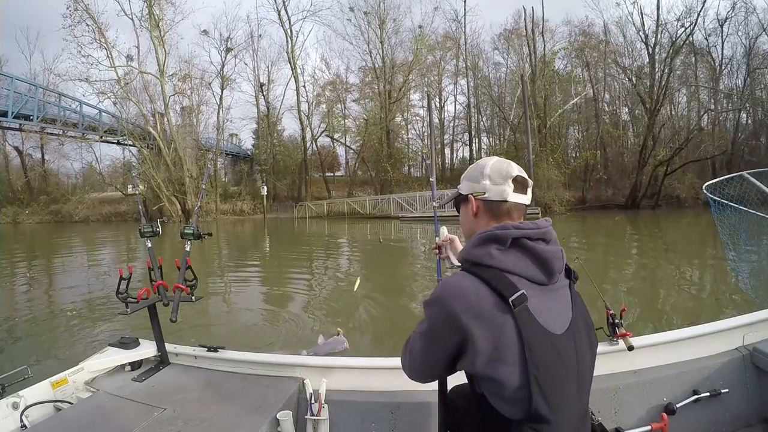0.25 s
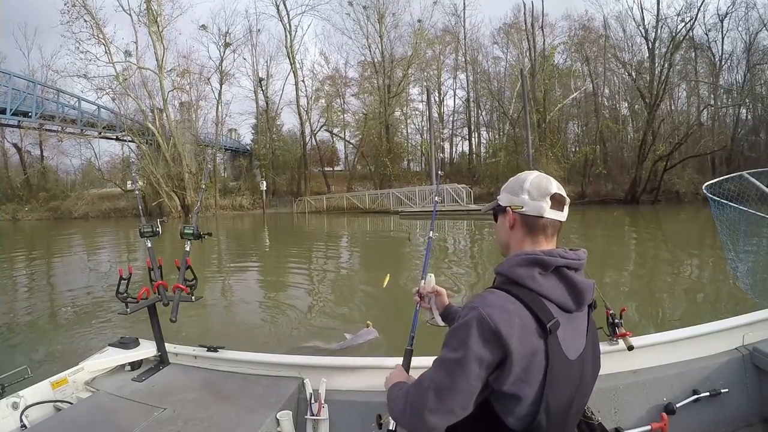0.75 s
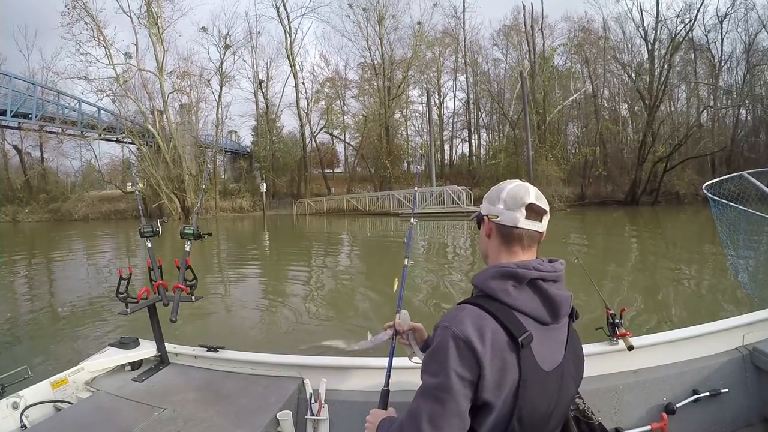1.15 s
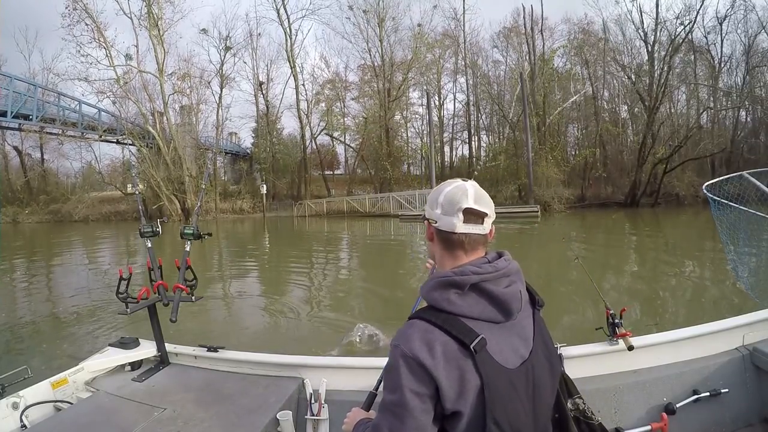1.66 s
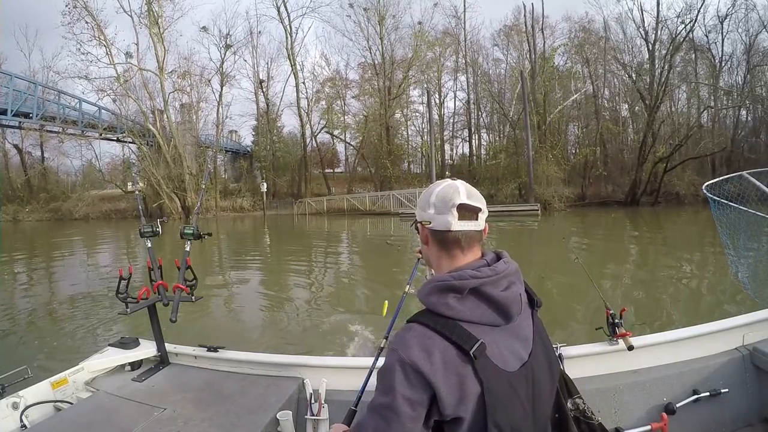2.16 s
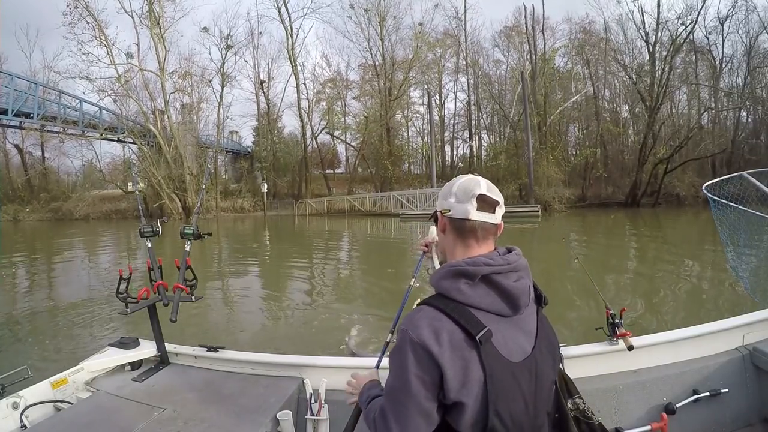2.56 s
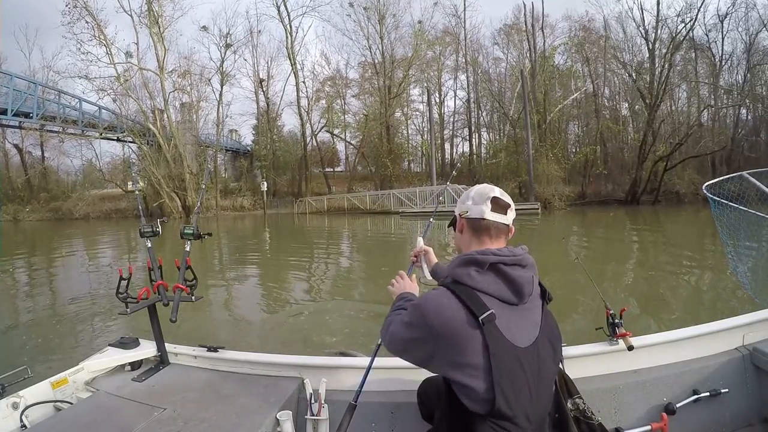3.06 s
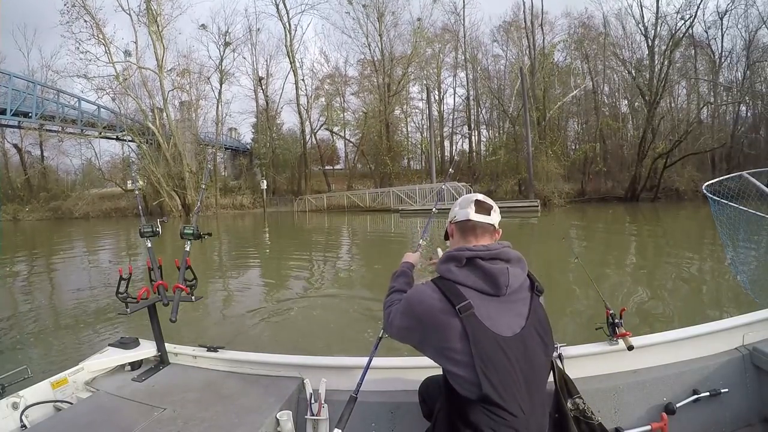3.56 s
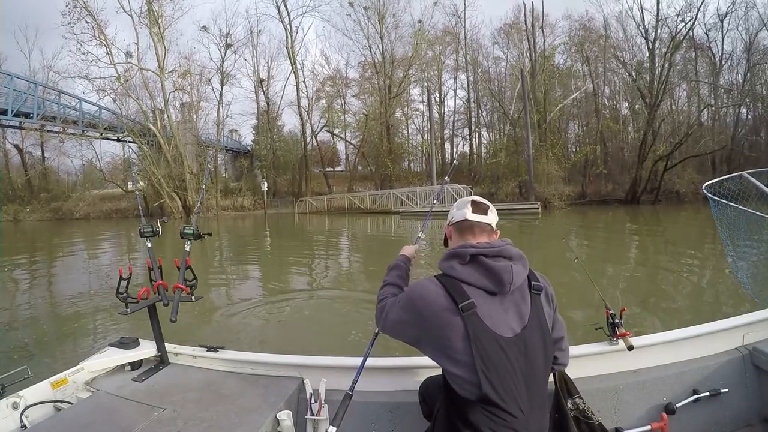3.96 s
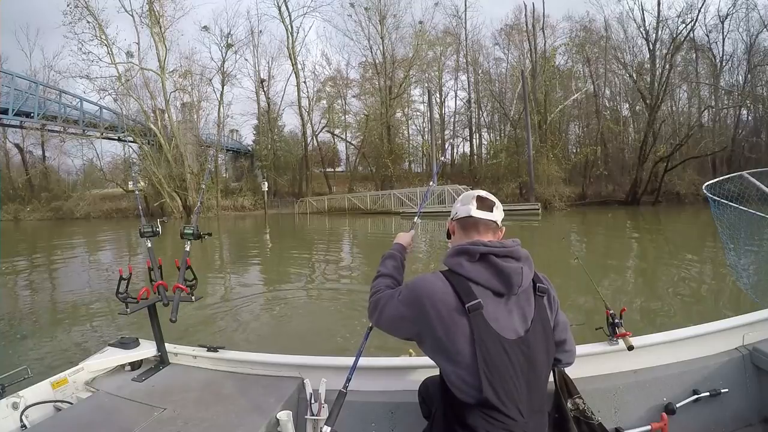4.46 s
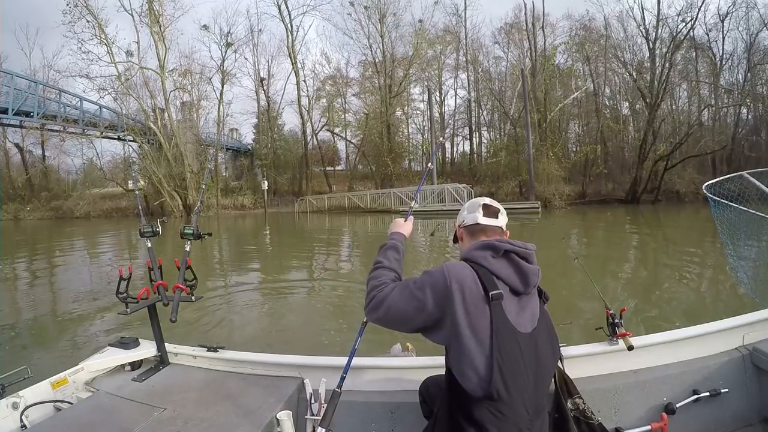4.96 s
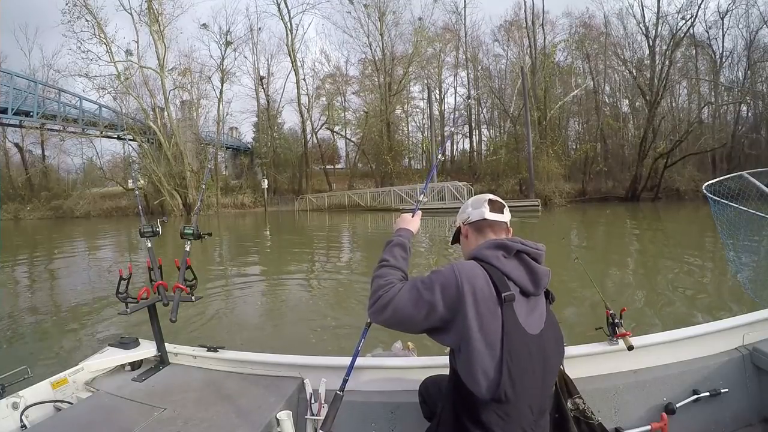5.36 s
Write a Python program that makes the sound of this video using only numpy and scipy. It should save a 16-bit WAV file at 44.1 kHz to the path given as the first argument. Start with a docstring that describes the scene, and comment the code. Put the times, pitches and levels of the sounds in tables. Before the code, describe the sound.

A fish is fought beside a metal boat. Low rumble and scuffing boots open, cloth swishes, and small bite bells chatter with growing energy. Splashes and bubbling accompany a loud hull bang, followed by a cluster of thuds and clangs. The water calms, bells keep tinkling irregularly, and a single wet smack closes it. Dry outdoor air, close single-channel microphone on the boat.

```python
"""Landing a fish in a metal boat

An angler lands a fish. Knocks travel through the hull as bending waves, treble first, and ring its plating.
Small bite bells and their clip on the rod ring and rattle as dying sines. Boots scrape, a sole squeaks and
bright bursts of hiss swish by, all shaped noise. The fish splashes: bubbles and one tail slap, among sharp
bright ticks. Outdoor air and the hull's low ringing, swelling after knocks, lie underneath as soft noise."""
import sys
import numpy as np
from scipy import signal
from scipy.fft import rfft, irfft
from scipy.io import wavfile
from scipy.ndimage import uniform_filter1d

SR = 44100
rng = np.random.default_rng(int(sys.argv[2]) if len(sys.argv) > 2 else 0)


def wav_out(sig):
    """Save sig, one row per channel (or a flat mono array), as 16-bit PCM at SR to the path in sys.argv[1]."""
    wavfile.write(sys.argv[1], SR, np.round(np.clip(np.atleast_2d(sig).T, -1, 1) * 32767).astype(np.int16))


N = 247401  # length in samples


# knocks on the hull: start_s, blow_db, contact_ms, panel_hz (pitch of the panel struck),
# lift_db (boost around that pitch), lag_ms (200 Hz behind the treble), front_db (first wave front)
KNOCKS = [(0.0, -41, 0.4, 359, 17, 2.77, 26), (1.107, -36.5, 0.55, 252, -6, 12, 5),
          (2.034, -11, 0.048, 195, 6.5, 10.2, 31.5), (2.576, -18.5, 0.12, 183, 5.5, 10.1, 24),
          (2.646, -25.5, 0.92, 271, 12.5, 9.4, 5), (2.746, -33.5, 0.81, 74, 5.5, 7.3, 5),
          (2.909, -28, 0.27, 205, 4, 9, 20), (2.964, -28, 1.64, 92, 8, 15, 5),
          (3.002, -40, 0.21, 296, 8.5, 8.2, 5), (3.04, -35, 1.3, 97, 11, 8.5, 5),
          (3.234, -18, 0.12, 437, 2, 6.18, -4), (3.237, -33.5, 0.0066, 4370, 3, 1.94, 15),
          (3.339, -21.5, 0.33, 185, 2, 7.2, 36), (3.35, -32.5, 0.95, 106, 15, 8.7, 5),
          (4.968, -46, 0.019, 590, 18, 4.1, 17), (5, -53, 0.035, 930, 13, 3.3, 12)]
# clear notes of the hull plating: pitch_hz, level_db, t60_s (time to fall 60 dB, before the water damps it)
HULL_NOTES = [(73.8, 5.5, 0.33), (102.3, -3.5, 0.41), (163.8, 0, 0.195), (205, 2, 0.16), (252, -7, 0.24),
              (310.7, -2, 0.22), (370, -18, 0.22), (406.5, -8, 0.21), (485, -9.5, 0.051), (529, -10, 0.12),
              (593, -5, 0.12), (673, -2, 0.09), (802, -12.5, 0.19), (834, -11.5, 0.12), (874, -11, 0.18),
              (1056, -16, 0.09), (1215, -7.5, 0.049), (1584, -18, .035), (1960, -3.5, 0.016),
              (2720, 4, 0.013)]
# dense ringing between the clear notes: pitch_hz, level_db
SHUDDER = [(25, -1), (60, 53.5), (200, 1.5), (800, -2.5), (2500, -15.5), (5000, -9.5), (9000, -2),
           (15000, -32)]
# how long that ringing lasts: pitch_hz, t60_s (before the water damps it)
SHUDDER_T60 = [(50, 0.89), (300, 0.36), (1000, 0.13), (3000, 0.18), (10000, 0.047)]
WET_DAMPING = 1.81  # the water under the hull shortens every ring by this factor


def knock(blow_db, contact_ms, panel_hz, lift_db, lag_ms, front_db):
    """A blow rings the plating; bending waves bring the treble first and the bass late."""
    size = 16384
    t, hz = np.arange(size) / SR, np.fft.rfftfreq(size, 1 / SR)
    notes = ring(np.array(HULL_NOTES) / [1, 1, WET_DAMPING], np.ones(len(HULL_NOTES)), t)
    dense = 4.96 * dying(SHUDDER, np.array(SHUDDER_T60) / [1, WET_DAMPING], count=size)
    # one pulse ahead of all reflections
    front = gain_of(front_db) * hz / (hz + 500) / (1 + (hz / 3000) ** 2)
    kept = t < 0.33  # seconds of ringing
    bass_cut = hz / (hz + 120)
    body = rfft(notes * kept) + (rfft(dense * kept) + front) * bass_cut

    octaves_away = np.log2((hz + 1) / panel_hz)
    panel = gain_of(lift_db * np.exp(-(octaves_away / 0.28) ** 2))
    # a soft blow lasts longer, with less treble
    contact = 1 / (1 + 2j * np.pi * hz * contact_ms / 1000) ** 2
    # the lowest pitches are cut away below about 45 Hz
    low_cut = (1j * hz / (45 + 1j * hz)) ** 2
    # the delay shrinks as pitch rises; then everything moves a quarter of the lag earlier
    travel = np.exp(-4j * np.pi * lag_ms / 1000 * (np.sqrt(280 * (hz + 80)) - 150))
    early = np.exp(2j * np.pi * hz * lag_ms / 4000)
    return gain_of(blow_db) * irfft(body * panel * contact * low_cut * travel * early)[:-1024]


def knocks():
    """All blows on the hull, each ringing out over the next."""
    out = np.zeros(N)
    for start_s, *blow in KNOCKS:
        add(out, start_s, knock(*blow))
    return out


# clear bell strikes: start_s, peak_db, near_hz (pitch nearest the strike)
STRIKES = [(0.1817, -37, 5760), (0.7654, -40.5, 6760), (0.789, -34.5, 6840), (0.824, -34, 6200),
           (0.8654, -32.5, 9250), (0.89, -31.5, 6660), (0.9514, -39, 6700), (0.966, -37, 6600),
           (0.9996, -41.5, 6500), (1.058, -40, 6660), (1.1624, -35.5, 6600), (1.2482, -45, 10200),
           (1.2725, -40, 8230), (1.3339, -30, 6230), (1.411, -29.5, 6200), (1.493, -25.5, 8900),
           (1.531, -36, 6900), (1.5604, -33, 6240), (1.684, -34, 7160), (1.7056, -38, 5960),
           (1.846, -32.5, 9300), (1.9055, -38, 7530), (2.015, -30.5, 9700), (2.038, -32, 7700),
           (2.061, -33, 6260), (2.095, -21.5, 8440), (2.109, -23.5, 7700), (2.147, -25, 6460),
           (2.198, -16, 8650), (2.2108, -25, 8800), (2.217, -39, 6600), (2.2576, -31.5, 9200),
           (2.265, -23.5, 9560), (2.462, -38, 9100), (2.483, -32, 6730), (2.5197, -32, 6700),
           (2.5478, -33, 9100), (2.5577, -29, 7040), (2.5853, -25.5, 7380), (2.6555, -32, 6500),
           (2.7082, -30, 8840), (2.732, -25.5, 7300), (2.7514, -24, 7500), (2.7727, -25.5, 7550),
           (3.1977, -38, 6450), (3.2204, -30, 5700), (3.241, -24.5, 8150), (3.2909, -32, 6830),
           (3.326, -28.5, 8500), (3.3742, -28, 6460), (3.399, -32, 6300), (3.696, -35, 7630),
           (3.7155, -39, 8240), (3.7417, -37, 6150), (3.819, -42.5, 6700), (3.8611, -32.5, 8900),
           (3.897, -37.5, 7600), (3.955, -32.5, 7640), (3.984, -35, 7550), (3.9943, -32, 6950),
           (4.0122, -29, 6160), (4.0649, -39, 6700), (4.1846, -35.5, 9100), (4.233, -36.5, 7260),
           (4.2761, -29, 8600), (4.326, -33, 7200), (4.365, -25, 6200), (4.404, -37, 6800),
           (4.4858, -39, 6640), (4.586, -33.5, 9000), (4.6255, -36.5, 6460), (4.7254, -27.5, 7700),
           (4.7504, -30.5, 8850), (4.797, -24.5, 6830), (4.8556, -30, 9700), (4.935, -37, 6730),
           (4.9488, -37, 6600), (5.0908, -29.5, 6270), (5.4231, -35, 8800), (5.5287, -27, 6400),
           (5.554, -32.5, 8700), (5.594, -27, 8930)]
# the rod trembles around each strike, never quite still; the share is a power that evens out the swell
SHAKE_S, SHAKE_REST_DB, SHAKE_SHARE = 0.063, -40, 0.8  # rest level before that power


def tremble():
    """How hard the rod shakes: it swells before and after every clear strike."""
    start_s, peak_db, _ = np.transpose(STRIKES)[..., None]
    t = np.arange(0, N + 64, 64) / SR
    swells = gain_of(peak_db) * np.exp(-abs(t - start_s) / SHAKE_S)
    swell = gain_of(SHAKE_REST_DB) + swells.sum(0)
    return np.interp(np.arange(N) / SR, t, swell ** SHAKE_SHARE)


# partials of the bells, each doubled into a close pair when played: pitch_hz, level_db
BELLS = [(5740, -9.5), (6465, -6), (6713, -4), (7150, -13.5), (7520, -10), (7900, -11.5), (8230, -6.5),
         (8800, -6), (9220, -6.5), (9700, -16), (10150, -11.5), (10700, -20), (11350, -17), (12300, -24),
         (13460, -26)]
BELL_T60 = 0.032  # s, for a struck bell
WEAK_PER_S, WEAK_DB = 8.7, -19  # faint extra strikes; dB against the tremble


def bell_strikes(shake):
    """Each strike rings all partials, most those near its pitch, and the clapper chatters."""
    out, t = np.zeros(N), np.arange(1500) / SR
    hz, partial_db = np.transpose(BELLS * 2)
    at = np.flatnonzero(rng.random(N) < WEAK_PER_S / SR)
    weak_db = WEAK_DB + 20 * np.log10(shake[at])
    weak = np.transpose([at / SR, weak_db, rng.uniform(6130, 8700, len(at))])
    strikes = np.vstack([STRIKES, weak])

    # random rebounds of the clapper follow each first hit
    rebounds = rng.standard_normal((200, 1300)) * (rng.random((200, 1300)) < 1200 / SR)
    chatter = 0.1 * rebounds * np.exp(-t[:1300] / 0.025)
    chatter[:, 0] = 1
    soft_start = 1 - np.exp(-t / 0.0003)
    quick = 1 + 0.6 * np.exp(-t / 0.002)  # the first ring is shed fast
    detune = 0.004  # each strike finds the bells held a little differently
    chance = rng.standard_normal((200, 2, len(hz)))
    for (start_s, peak_db, near_hz), (luck, drift), hops in zip(strikes, chance, chatter):
        near = 1 + 2.46 * np.exp(-((hz - near_hz) / 250) ** 2)
        t60 = np.full(len(hz), BELL_T60)
        held = np.transpose([hz * (1 + detune * drift), partial_db + 1.67 * luck, t60])
        hit = quick * soft_start * ring(held, near * np.sign(luck), t)
        strike = signal.fftconvolve(hit, hops)
        add(out, start_s, gain_of(peak_db) * strike / abs(strike).max())
    return out


ROLL_DB = -38  # against the tremble


def bell_rolls(shake):
    """Between strikes, many tiny touches ring one partial each, as loud as the rod trembles."""
    out, t = np.zeros(N), np.arange(1500) / SR
    hz, partial_db = np.transpose(BELLS * 2)
    touch_db = 3.2 * np.minimum(rng.exponential(1, N), 4)
    touches = gain_of(touch_db) * (rng.random(N) < 1500 / SR)
    which = rng.integers(0, len(hz), N)
    detuned = hz * (1 + 0.0061 * rng.standard_normal(len(hz)))
    for k, (f, db) in enumerate(zip(detuned, partial_db)):
        note = ring([(f, db, 0.42 * BELL_T60)], np.ones(1), t)
        out += signal.oaconvolve(touches * (which == k), note)[:N]
    return gain_of(ROLL_DB) * shake * evened(out)


# the one note of the bell clip: pitch_hz, level_db, t60_s
CLIP_NOTE = (3260, 0.5, 0.035)
CLIP_DB, CLIP_ROLL_DB = -37.5, -47.5  # added to 0.65 of the strike's dB; against the tremble


def clinks(shake):
    """The bell clip rings a lower, beating note at each strike, and faintly while the rod trembles."""
    out, t = np.zeros(N), np.arange(3000) / SR
    for (start_s, peak_db, _), drift in zip(STRIKES, rng.standard_normal((len(STRIKES), 2))):
        # two slightly different pitches beat
        pair = ring([np.multiply(CLIP_NOTE, [1 + 0.017 * d, 1, 1]) for d in drift], np.ones(2), t)
        add(out, start_s, gain_of(CLIP_DB + 0.65 * peak_db) * pair)
    touches = rng.standard_normal(N) * (rng.random(N) < 250 / SR)
    faint = evened(signal.oaconvolve(touches, ring([CLIP_NOTE], np.ones(1), t))[:N])
    return out + gain_of(CLIP_ROLL_DB) * shake * faint


# bursts of churned water: start_s, rise_s, hold_s, fall_s, level_db
SPLASHES = [(1.5, 0.017, .45, .1, -48.5), (1.56, 0.084, 0.18, .08, -49), (2.06, 0.018, 0.17, .25, -43),
            (2.4, 0.099, 0.022, .02, -42.5), (2.62, 0.066, .25, 0.034, -52),
            (2.98, 0.037, 0.0085, 0.02, -50.5), (3.09, 0.03, 0.012, 0.011, -58)]
# clear single bubbles: start_s, level_db (before the bubble's own fade), pitch_hz
BUBBLES = [(1.512, -33, 1520), (1.559, -37, 2020), (1.616, -34, 2550), (1.638, -29.5, 2580),
           (1.662, -35, 560), (1.713, -35, 1320), (1.74, -28.5, 2110), (1.747, -33, 1820),
           (1.804, -38, 1770), (1.865, -27.5, 1410), (1.922, -36, 570), (1.978, -39, 1460),
           (2.001, -34, 2380), (2.0915, -31, 1340), (2.17, -36, 1820), (2.288, -35, 597), (2.29, -37, 1800),
           (2.335, -38, 2100), (2.7006, -38, 1520), (2.8024, -41, 1650), (2.8521, -33, 2500),
           (3.141, -37, 2800)]
# tail slap on wet metal: start_s, level_db (before its soft start), t60_s (in the treble)
SLAP = [(5.5288, -19, 0.094)]
# colour of the slap: pitch_hz, level_db (per Hz)
SLAP_COLOUR = [(180, -45), (300, -26), (417, -18), (476, 4), (652, -36), (835, -4.5), (985, -28),
               (1490, -5), (1750, -7), (2930, -6), (4650, -13), (10300, -23), (15500, -55)]


def water():
    """Many small bubbles of all sizes, a few clear ones, and one slap of dying noise."""
    fizz, out = np.zeros(N), np.zeros(N)
    drop_db = 3.95 * np.minimum(rng.exponential(1, N), 4)
    drops = gain_of(drop_db) * (rng.random(N) < 2500 / SR)
    size = rng.integers(0, 20, N)
    for k, hz in enumerate(np.geomspace(450, 14000, 20)):
        # quieter on both sides of 1800 Hz, in dB per octave
        tilt_db = -4.2 * max(np.log2(1800 / hz), 0) - 0.83 * max(np.log2(hz / 1800), 0)
        fizz += gain_of(tilt_db) * signal.oaconvolve(drops * (size == k), bubble(hz, cycles=3.8))[:N]
    for start_s, level_db, hz in BUBBLES:
        add(out, start_s, gain_of(level_db) * bubble(hz, cycles=4.1))
    soft_start = 1 - np.exp(-np.arange(8000) / 60)
    for start_s, level_db, t60 in SLAP:
        # the low bands last longest
        band_t60 = [(300, 3.4 * t60), (2500, 1.7 * t60), (5000, t60), (15000, t60)]
        slap = dying(SLAP_COLOUR, band_t60, count=8000)
        add(out, start_s, gain_of(level_db) * slap / abs(slap).max() * soft_start)
    return out + strokes(SPLASHES) * evened(fizz)


def bubble(hz, cycles):
    """A pocket of air rings briefly and rises a little in pitch."""
    turns = np.arange(round(3 * cycles * SR / hz)) * hz / SR
    rising = turns * (1 + 0.02 * turns / cycles)
    return np.sin(2 * np.pi * rising) * np.exp(-turns / cycles) * (1 - np.exp(-turns))


# sharp bright ticks, spray and the crack of hard knocks:
# start_s, level_db (of the noise before it is brightened)
TICKS = [(1.044, -46), (1.249, -40), (1.2728, -47), (1.4134, -47), (1.556, -36), (1.6788, -48),
         (1.8948, -54), (2.0136, -45), (2.037, -35), (2.058, -37), (2.1383, -40), (2.178, -47),
         (2.264, -39), (2.5765, -38), (2.7255, -35), (3.149, -44)]
SPRAY_PER_S, SPRAY_DB = 12, -5  # fainter ticks, heard while the water churns; dB against its level


def ticks():
    """Spray and the crack of hard knocks: tiny dying noise, brightened by sample-to-sample differences."""
    out, t = np.zeros(N), np.arange(400) / SR
    churn = gain_of(SPRAY_DB) * strokes(SPLASHES)
    at = np.flatnonzero(rng.random(N) < SPRAY_PER_S / SR)
    rows = [(start_s, gain_of(db)) for start_s, db in TICKS] + list(zip(at / SR, churn[at]))
    for (start_s, gain), burst in zip(rows, rng.standard_normal((300, 401))):
        add(out, start_s, gain * np.diff(burst) * np.exp(-t / 0.0016))
    return out


# boot hiss in the air: start_s, rise_s, hold_s, fall_s, level_db
SCRAPES = [(0.03, 0.297, 0.018, 0.022, -41), (0.34, 0.095, 0.15, 0.097, -42)]
# colour of the hiss: pitch_hz, level_db (per Hz)
SCRAPE_COLOUR = [(180, -14), (300, -15), (391, -10), (461, -9), (500, -27), (744, -15.5), (2280, -17),
                 (2560, -18), (8420, -16), (15500, -36)]
# low sound felt in the hull, first as the opening knock dies away, then from a dragged boot: start_s, rise_s,
# hold_s, fall_s, level_db
DRAGS = [(0.0, .01, 0.099, .12, -61), (0.35, .12, 0.061, 0.12, -33)]
# colour of the drag: pitch_hz, level_db (per Hz)
DRAG_COLOUR = [(40, -26), (70, -7), (200, -1.5), (300, -3.5), (500, -10), (900, -17.5), (1600, -25),
               (2600, -31)]


def boots():
    """A boot scrape hisses in the air and drags low through the hull; at the very start the hull still hums low
    after the first knock."""
    hiss = noise(SCRAPE_COLOUR, size=256, patchy_db=0.5)
    drag = noise(DRAG_COLOUR, size=1024, patchy_db=3)
    return strokes(SCRAPES) * hiss + strokes(DRAGS) * drag


# bright bursts of hiss, cloth, splash spray and the hiss of a knock:
# start_s, rise_s, hold_s, fall_s, level_db
HISS_BURSTS = [(0.0, 0.0044, 0.11, 0.29, -59.5), (0.56, .06, 0.12, 0.37, -50),
               (1.51, 0.048, 0.011, 0.033, -44), (1.6, 0.026, 0.036, .3, -47.5),
               (1.886, 0.012, 0.0044, 0.044, -41.5), (2.33, .14, 0.064, .02, -43),
               (2.57, 0.0067, 0.016, 0.2, -41), (2.78, 0.028, 0.008, 0.024, -49),
               (2.85, 0.025, 0.049, 0.43, -50.5), (4.98, 0.11, 0.28, 0.073, -51)]
# their shared colour: pitch_hz, level_db (per Hz)
HISS_COLOUR = [(290, -40), (500, -8), (594, -9), (666, -25), (726, -9), (2890, -5.5), (8980, -3.5),
               (15500, -17)]


def hiss_bursts():
    """Cloth swishes, splash spray and the hiss of a knock, all as bright, patchy noise."""
    return strokes(HISS_BURSTS) * noise(HISS_COLOUR, size=256, patchy_db=3.0)


# the sole grips before it stops: start_s, rise_s, hold_s, fall_s, level_db
SQUEAKS = [(.275, 0.045, 0.026, .008, -47)]


def squeak():
    """A gripping sole gives hiss squeezed into a band a little below 2 kHz."""
    band = [(900, -28), (1600, 1), (1900, 5), (2500, -7), (4000, -28)]  # pitch_hz, level_db
    return strokes(SQUEAKS) * noise(band, size=256, patchy_db=1.0)


# colour of the background: pitch_hz, level_db (per Hz)
AIR_COLOUR = [(12, -40), (20, 0.5), (70, -1.5), (372, -25), (746, -24.5), (2760, -35), (3170, -40.5),
              (4070, -37), (6020, -40), (6540, -54), (7110, -36), (8880, -57), (10800, -47.5), (14300, -43),
              (15500, -46)]
AIR_DB = -43  # level of the whole bed, before its lows are taken out
# low rumble, outdoor air with the hull's low ringing swelling after knocks: time_s, level_db
RUMBLE = [(0.0, -38), (0.31, -47), (0.55, -33.5), (0.69, -45.5), (1.15, -43), (1.42, -46), (2.02, -46.5),
          (2.19, -36), (2.39, -45.5), (2.56, -37.5), (3.02, -44), (3.41, -39), (3.58, -45), (3.81, -41),
          (4.1, -44), (5.61, -45)]


def air():
    """Distant hiss over a low rumble of outdoor air and hull ringing; one noise is split at 170 Hz."""
    bed = noise(AIR_COLOUR, size=2048, patchy_db=2.4)
    lows = signal.sosfiltfilt(signal.butter(2, 170, fs=SR, output="sos"), bed)
    hiss = gain_of(AIR_DB) * (bed - lows)
    return hiss + gain_of(level(RUMBLE)) * evened(lows)


def gain_of(db):
    """Decibels to amplitude."""
    return 10 ** (np.asarray(db) / 20)


def evened(x):
    """Scales to an rms (average strength) of 1."""
    return x / np.sqrt(np.mean(x ** 2) + 1e-20)


def read(points, hz):
    """Reads a curve between its points on a log-frequency axis."""
    f, value = np.transpose(points)
    return np.interp(np.log(hz + 1), np.log(f + 1), value)


def level(rows):
    """A dB curve over the whole scene."""
    return np.interp(np.arange(N) / SR, *np.transpose(rows))


def add(mix, start_s, sound):
    """Mixes a sound in at a time."""
    part = mix[max(round(start_s * SR), 0):][:len(sound)]
    part += sound[:len(part)]


EDGE_DB = 10  # this gain is subtracted, so strokes begin and end at zero and hold 3.3 dB under level_db


def strokes(rows):
    """Loudness of gestures that rise out of silence, hold and fall."""
    out = np.zeros(N)
    for start_s, rise_s, hold_s, fall_s, level_db in rows:
        corners = np.cumsum([0, rise_s, hold_s, fall_s])
        under_db = np.interp(np.arange(0, corners[-1], 1 / SR), corners, [EDGE_DB, 0, 0, EDGE_DB])
        add(out, start_s, gain_of(level_db) * (gain_of(-under_db) - gain_of(-EDGE_DB)))
    return out


def noise(points, size, patchy_db):
    """Random short-time spectra of a given colour with drifting loud and soft patches, rms 1."""
    frames, hz = 4 * N // size + 5, np.fft.rfftfreq(size, 1 / SR)
    a, b, patches = rng.standard_normal((frames, len(hz), 3)).T
    patches = uniform_filter1d(patches, size=10, axis=0)  # smooth across pitch
    patches = evened(uniform_filter1d(patches, size=10, axis=1))  # and across time
    z = (a + 1j * b) * gain_of(read(points, hz)[:, None] + patchy_db * patches)
    return evened(signal.istft(z, nperseg=size, noverlap=3 * size // 4)[1][:N])


def ring(notes, weights, t):
    """Sum of dying sines."""
    hz, db, t60 = np.transpose(notes)[..., None]
    sines = gain_of(db - 60 * t / t60) * np.sin(2 * np.pi * hz * t)
    return (weights[:, None] * sines).sum(0)


def dying(colour, t60, count):
    """Noise whose bands die away, each at its own speed."""
    hz, t, z = signal.stft(rng.standard_normal(count), SR, nperseg=256)
    band_db = read(colour, hz)[:, None] - 60 * t / read(t60, hz)[:, None]
    return signal.istft(z * gain_of(band_db), SR)[1][:count]


def scene():
    """All sources added into one channel."""
    shake = tremble()
    rod = bell_strikes(shake) + bell_rolls(shake) + clinks(shake)
    rubbing = boots() + squeak()
    bursts = hiss_bursts() + ticks()
    return (knocks() + rod + water() + rubbing + bursts + air())[None]


EDGE_HZ = 15400  # top of the band


def record(dry):
    """The loudest swings overload against a soft ceiling; then a filter removes the highest treble."""
    ceiling = 0.73
    held = dry / (1 + abs(dry / ceiling) ** 10) ** (1 / 10)
    lowpass = signal.firwin(511, EDGE_HZ, window=("kaiser", 9), fs=SR)
    return signal.oaconvolve(held, lowpass[None], "same")


dry = scene()
out = record(dry)
wav_out(out)
```